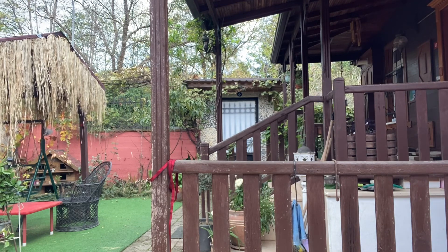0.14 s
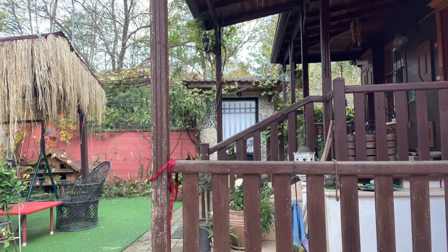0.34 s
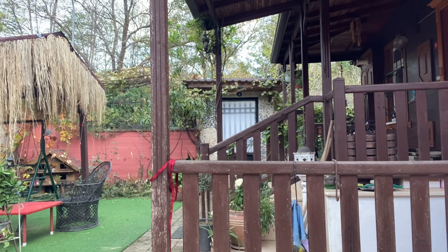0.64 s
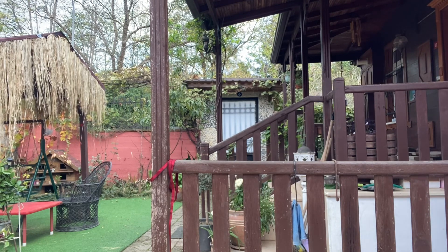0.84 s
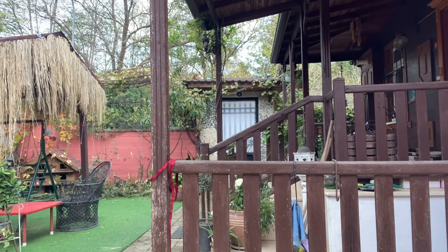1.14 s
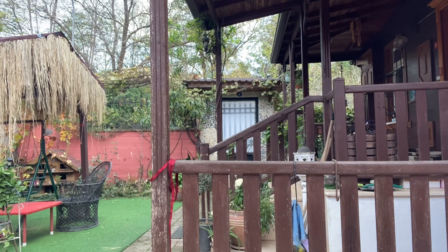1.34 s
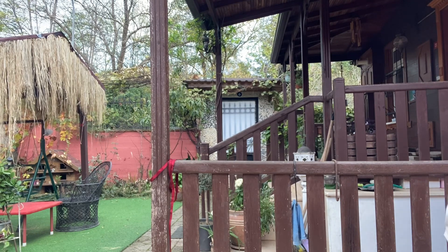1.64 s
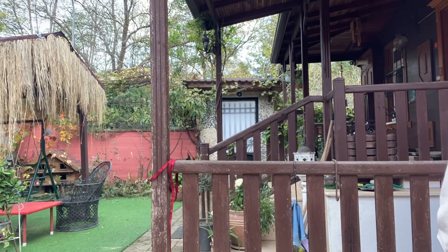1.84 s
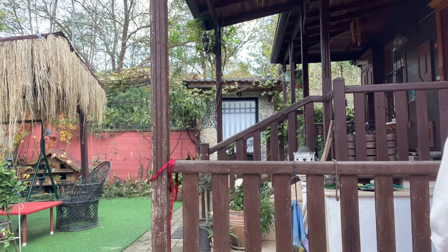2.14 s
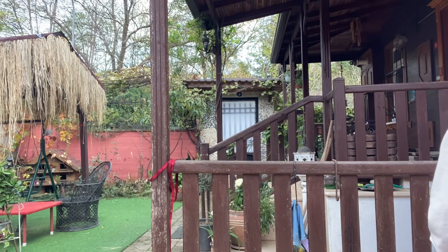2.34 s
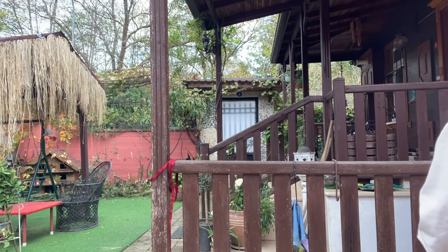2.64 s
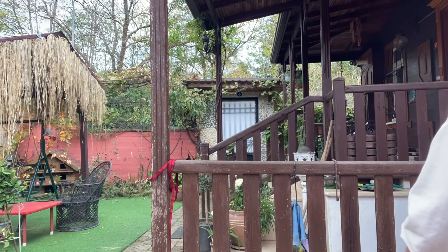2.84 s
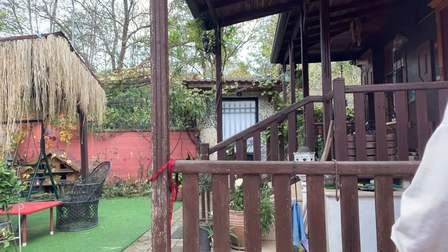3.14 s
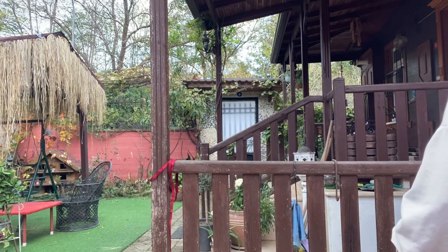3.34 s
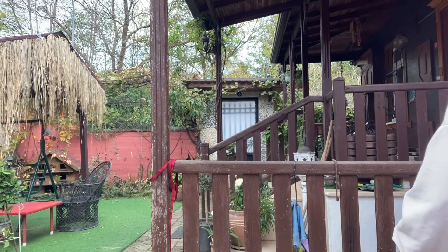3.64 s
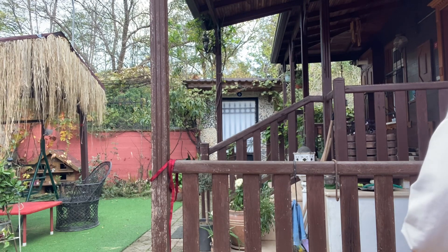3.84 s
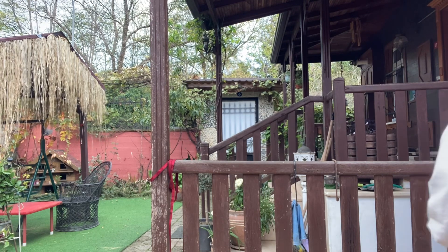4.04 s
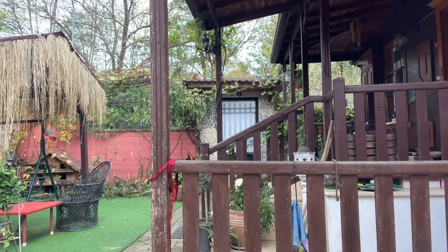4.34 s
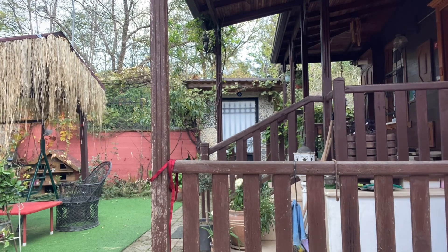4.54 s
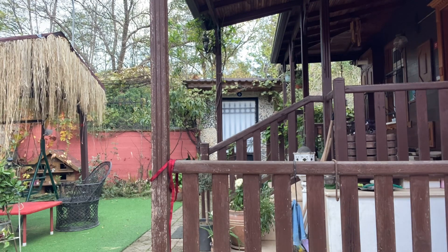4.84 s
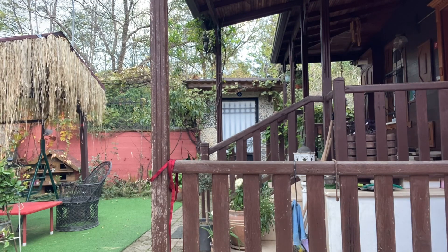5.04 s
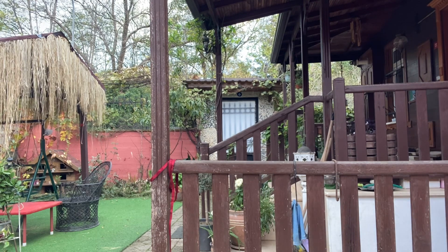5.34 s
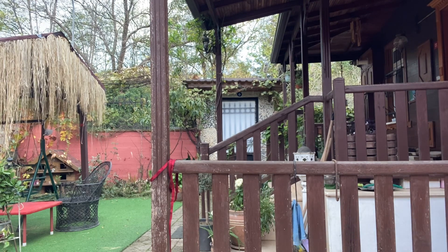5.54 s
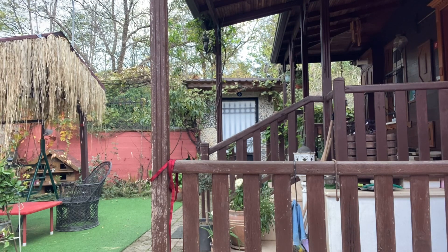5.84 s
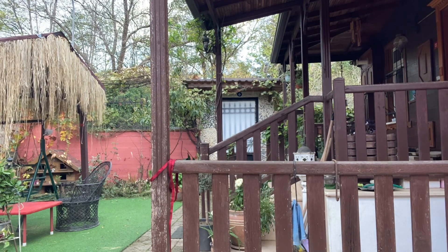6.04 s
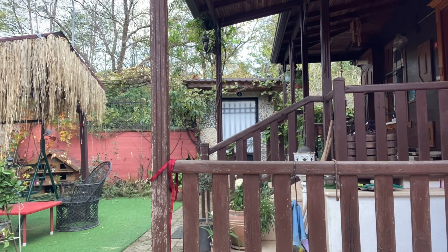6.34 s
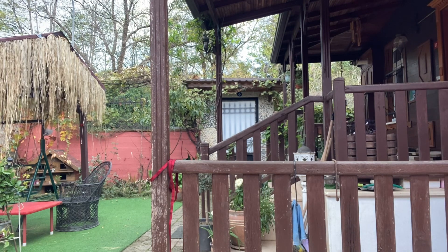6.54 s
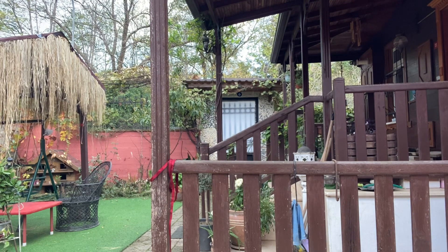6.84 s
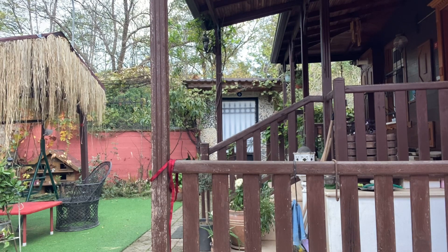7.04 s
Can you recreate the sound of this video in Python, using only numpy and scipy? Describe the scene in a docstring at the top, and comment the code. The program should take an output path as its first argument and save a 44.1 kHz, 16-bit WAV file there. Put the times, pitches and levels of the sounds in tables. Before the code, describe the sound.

A stiff broom sweeps a paved garden path in short, irregular strokes. The bristles hiss on stone, dry leaves scrape, twigs and grit tick, and the wooden head knocks now and then, hardest near the end. Distant traffic rumbles throughout: one engine slows away at the start, a faint motor hums midway, and another engine approaches at the close. The microphone sits on a porch nearby.

```python
"""Sweeping a garden path

A stiff broom sweeps dry leaves and grit over paving, out of sight of a phone on a porch. The bristles
hiss as they slip over the stone, the wooden head knocks and rings, and twigs and grit snap with a tick.
Traffic rumbles behind the wall: one engine slows away at the start, a far motor hums midway, and
another engine draws near at the end."""
import sys
import numpy as np
from scipy import signal
from scipy.fft import rfft, irfft, next_fast_len
from scipy.io import wavfile
from scipy.ndimage import uniform_filter1d, map_coordinates

SR = 44100
rng = np.random.default_rng(int(sys.argv[2]) if len(sys.argv) > 2 else 0)


def put_to_file(sound):
    """Save the sound as 16-bit audio at rate SR, in the file named by the first command-line argument."""
    columns = np.atleast_2d(sound).T  # one column per channel
    safe = np.clip(columns, -1, 1)
    whole_steps = np.round(safe * 32767)
    wavfile.write(sys.argv[1], SR, whole_steps.astype(np.int16))


N = 317455

TIME = np.arange(N) / SR
SHARED_ONLY = np.array([[1], [0]])  # puts a sound in the row that both microphones share


def amp(db):
    """Turn a level in decibels (dB) into a number to multiply by."""
    return 10 ** (np.asarray(db) / 20)


def along(points, hz):
    """Read between (frequency, value) points, giving each octave the same room."""
    freqs, values = np.transpose(points)
    return np.interp(np.log(hz + 1), np.log(freqs + 1), values)


def curves(rows):
    """Turn each table column after the time into one value per sample."""
    times, *columns = np.transpose(rows)
    return [np.interp(TIME, times, column) for column in columns]


def during(rows, fade_s):
    """1 while a table runs, fading in before it and out after it."""
    return np.clip(np.minimum(TIME - rows[0][0], rows[-1][0] - TIME) / fade_s + 1, 0, 1)


def wobble(rate):
    """A smooth curve through `rate` random values a second."""
    return map_coordinates(rng.standard_normal(int(N * rate / SR) + 4), [TIME * rate])


def filtered(x, response):
    """Multiply each frequency in x by response(frequency)."""
    size = next_fast_len(N + SR // 4)
    return irfft(rfft(x, size) * response(np.fft.rfftfreq(size, 1 / SR)), size)[..., :N]


def unit(x):
    """Scale x to an average strength (rms) of 1."""
    return x / np.sqrt(np.mean(x ** 2) + 1e-20)


def rush(spectrum, lo_hz, hi_hz, patchy_db, sizes=1):
    """Two noises with loud and soft patches, coloured by a spectrum, of strength 1 from lo to hi."""
    cells = signal.stft(sizes * rng.standard_normal((2, N)), nperseg=512)[2]
    patches = uniform_filter1d(rng.standard_normal(cells.shape[1:]), size=6, axis=0)
    patches = uniform_filter1d(patches, size=10, axis=1)
    pair = unit(signal.istft(cells * amp(patchy_db * unit(patches)), nperseg=512)[1][:, :N])
    colour = lambda hz: amp(along(spectrum, hz))
    band_power = np.mean(colour(np.linspace(lo_hz, hi_hz, 200)) ** 2) * (hi_hz - lo_hz) / (SR / 2)
    return filtered(pair, colour) / np.sqrt(band_power)


def tone(hz, multiple=1):
    """A pure tone of strength 1 on a multiple of a moving pitch."""
    return np.sqrt(2) * np.sin(multiple * 2 * np.pi * np.cumsum(hz) / SR + rng.uniform(0, 2 * np.pi))


def grains(size_db, clump_db):
    """Sizes of tiny slips, uneven and coming in clumps."""
    return amp(size_db * rng.standard_normal(N) + clump_db * (wobble(60) + wobble(250)))


def swell(times, levels_db, rise, fall):
    """Power of one movement: it rises to its first point and falls after its last (dB per second)."""
    edge_db = rise * np.minimum(TIME - times[0], 0) - fall * np.maximum(TIME - times[-1], 0)
    return 10 ** (np.maximum(np.interp(TIME, times, levels_db) + edge_db, -150) / 10)


def broom_pressure():
    """Strength of hiss, top treble and scrape: each stroke pushes, eases, lifts and trails off."""
    # broom strokes: (touch [s], push [s], lift [s], hiss at touch [dB], hiss at push [dB],
    # dragged leaves [dB over the hiss], top treble [dB over the hiss])
    strokes = [(-.05, -0.001, 0.4, -61, -59.5, -8, -2.5), (0.236, 0.313, 0.35, -65, -54.5, 0.5, -1.5),
               (0.61, 0.79, 1.04, -61.5, -53, -9, 2), (0.855, 0.945, 1.02, -55, -46, -9.5, -2),
               (1.307, 1.315, 1.35, -64, -59, -0.5, -6), (1.427, 1.44, 1.68, -57, -59.5, -17, 0),
               (1.58, 1.65, 1.73, -51, -50, -6, 0), (2.032, 2.046, 2.13, -63.5, -63.5, 1.5, -4),
               (2.13, 2.234, 2.37, -67, -58, -8, 1), (2.737, 2.737, 2.95, -61, -58, -2.5, 0.5),
               (2.86, 3, 3.04, -59, -51.5, -13, 0), (3.243, 3.273, 3.37, -75, -74, 4, -6),
               (3.404, 3.504, 3.65, -63.5, -56, -12, 1.5), (3.795, 3.857, 3.87, -65, -60.5, 0, -5),
               (4.236, 4.293, 4.4, -77, -72, 4.5, -7), (4.43, 4.452, 4.46, -72, -63, 3, -4),
               (4.474, 4.504, 4.53, -62, -59.5, 4, -5), (4.54, 4.556, 4.58, -65, -59, -1.5, -3),
               (4.816, 4.836, 5.3, -67, -71.5, -8, -4), (4.872, 4.94, 4.99, -57, -59, 1, 0),
               (5.065, 5.2, 5.23, -75, -56.5, -1.5, -4), (5.312, 5.39, 5.41, -77, -59, -17, 1.5),
               (5.401, 5.54, 5.75, -54.5, -46.5, -31, 0), (5.66, 5.68, 5.45, -52, -49.5, -18, -3),
               (5.77, 5.797, 5.82, -61, -59.5, -1, -2), (6.28, 6.45, 6.59, -63, -46, -11.5, 0.5),
               (6.573, 6.936, 7, -67, -69.5, 0.5, -3.5), (6.97, 7.097, 7.56, -70, -61, -2.5, -2)]
    # the broom shoves into a heap of leaves: (time [s], scrape level [dB], length [s])
    shoves = [(0.088, -60, 0.081), (0.603, -61, 0.025), (1.312, -67, 0.011), (1.43, -48, 0.0035),
              (2.038, -62, 0.065), (2.298, -58, 0.011), (2.728, -60, 0.026), (2.982, -56.5, 0.035),
              (3.548, -57.5, 0.037), (4.496, -59, 0.034), (4.874, -56, 0.02), (4.91, -56, 0.065),
              (5.663, -59, 0.024), (6.272, -49, 0.0045), (7.037, -63, 0.036)]
    ease_db, tail_db, tail_top_db = -8.5, -15.5, -5  # each stroke ends in a quieter, duller tail of hiss
    hiss, top = np.zeros(N), np.zeros(N)
    scrape = np.full(N, amp(-76.5) ** 2)  # a faint, steady background hiss under the strokes
    for touch, push, lift, touch_db, push_db, leaves_db, top_db in strokes:
        stroke = swell([touch, push, lift], [touch_db, push_db, push_db + ease_db], rise=1100, fall=379)
        tail = swell([lift], [push_db + tail_db], rise=1100, fall=69)
        hiss += stroke + tail
        top += amp(top_db) ** 2 * (stroke + amp(tail_top_db) ** 2 * tail)
        scrape += amp(leaves_db) ** 2 * (stroke + tail)
    for start, db, length in shoves:
        scrape += swell([start, start + length], [db, db], rise=808, fall=242)
    return np.sqrt([hiss, top, scrape])


def sweeping():
    """Many bristle tips slip over the stone; leaves and grit scrape along in front of them."""
    # the bristles' bright hiss: (frequency [Hz], relative level [dB])
    bristles = [(2500, -13.5), (4500, -6), (6500, -1.5), (8000, 0), (11000, -3), (13500, -2.5), (16000, -3)]
    # the leaves' lower scrape: (frequency [Hz], relative level [dB])
    leaves = [(600, -33), (1300, -8.5), (2200, -3), (3500, -1), (5500, -3.5), (8000, -12.5), (13000, -33)]
    hiss_gain, top_gain, scrape_gain = broom_pressure()
    hiss = rush(bristles, 5500, 16400, patchy_db=2, sizes=grains(size_db=1.5, clump_db=0.8))
    top = filtered(hiss, lambda hz: np.clip((hz - 9500) / 2500, 0, 1))
    scrape = rush(leaves, 2700, 5600, patchy_db=3, sizes=grains(size_db=4, clump_db=2))
    return hiss_gain * (hiss - top) + top_gain * top + scrape_gain * scrape


def traffic():
    """A far road: an uneven low rumble, the drone of engines and the smooth wash of tyres."""
    # how loud the road is: (time [s], rumble [dB], tyre wash [dB])
    levels = [(0, -35.5, -46.5), (.45, -39, -46.5), (.8, -44.5, -47), (1.14, -38.5, -48.5),
              (1.92, -43, -50), (2.61, -41, -53), (3.0, -39.5, -53), (4.1, -44.5, -54), (4.5, -39, -53.5),
              (5.3, -37.5, -53.5), (5.6, -39.5, -53), (6.06, -42, -52), (6.58, -38.5, -51),
              (6.95, -45.5, -47), (7.2, -48, -45.5)]
    # the colours of rumble, drone and tyre wash, each: (frequency [Hz], relative level [dB])
    rumble_colour = [(12, -52), (20, -48), (24, -27), (31, -12), (42, -3), (54, 0.5), (67, 1.5), (124, -17),
                     (156, -18.5), (200, -21), (260, -61), (440, -120)]
    drone_colour = [(70, -1.5), (110, 2), (160, -3), (250, -3), (400, -9), (600, -25), (1000, -61)]
    wash_colour = [(250, -9.5), (450, -1), (800, -1), (1200, -6), (2000, -10), (3000, -18), (5000, -24),
                   (8000, -36), (11000, -61), (14000, -68)]
    rumble_db, wash_db = curves(levels)
    rumble = amp(rumble_db + 0.74 * wobble(2.9)) * rush(rumble_colour, 43.4, 100, patchy_db=-0.5)
    drone = amp(wash_db + 1) * rush(drone_colour, 111, 486, patchy_db=1.5)
    wash = amp(wash_db) * rush(wash_colour, 420, 2460, patchy_db=1.9)
    return rumble + drone + wash


def leaving_engine():
    """An engine slows away: its exhaust note sinks and its noisy thrum dies down."""
    # the exhaust note, with a gap as the driver eases off:
    # (time [s], firing rate [Hz], level [dB], level an octave up [dB])
    exhaust = [(0, 89.15, -40.5, -56.5), (.35, 83.9, -41.5, -45.5), (.596, 74.4, -33.5, -53),
               (.75, 67.2, -29, -50), (.846, 61.1, -60, -48), (.926, 56.46, -37, -39),
               (.984, 57.23, -40, -49.5), (1.088, 55.14, -29.5, -50), (1.3, 54.5, -59, -72)]
    # the body of the engine's noise: (frequency [Hz], relative level [dB])
    thrum_colour = [(150, -33), (280, 4), (400, -10), (600, 6.5), (800, -10), (1200, -37)]
    hz, db, octave_db = curves(exhaust)
    firing = amp(db + 2.4 * wobble(12.2)) * tone(hz)
    octave = amp(octave_db + 3.45 * wobble(14.65)) * tone(hz + 0.79 * wobble(15), multiple=2)
    thrum = amp(-53 - 5.5 * TIME) * rush(thrum_colour, 250, 650, patchy_db=3)
    return during(exhaust, fade_s=0.18) * (firing + octave) * SHARED_ONLY + thrum


def head_knocks():
    """Each knock is a short rattle that sets the wooden head ringing, most strongly near one pitch."""
    # knocks: (time [s], level [dB], pitch struck hardest [Hz], spread around it [octaves],
    # rattle length [s], stretch of the ring time [factor])
    knocks = [(0.082, -40.5, 4600, 0.34, 0.064, 1.5), (0.988, -58, 1349, 1.2, 0.031, 1.1),
              (1.4222, -29.5, 1660, 0.055, 0.06, 2.5), (1.4238, -28, 755, 0.06, 0.045, 1.6),
              (1.4225, -34, 1180, .12, .04, 2.5), (1.43, -37.5, 343, 0.41, .04, .6),
              (1.426, -34, 2500, 0.48, 0.055, 1), (1.657, -37.5, 1480, 0.32, 0.096, 1.1),
              (2.037, -44.5, 1690, 0.52, 0.13, 1.1), (2.3, -39, 1670, 1.1, 0.054, .9),
              (2.731, -41, 1490, 1.5, 0.07, 1.1), (2.749, -42, 1530, 0.11, 0.063, 1.3),
              (2.773, -44.5, 1540, 0.13, 0.11, 1.3), (2.924, -40.5, 900, 0.3, 0.025, .6),
              (2.983, -36.5, 930, 0.37, 0.026, .7), (2.991, -34.5, 1600, 0.19, 0.043, .8),
              (3.307, -40.5, 960, 0.17, 0.038, 1.1), (3.576, -43.5, 1685, 0.42, 0.1, 1.1),
              (4.449, -52, 4200, .4, 0.027, .9), (4.496, -37, 2650, 0.3, .035, .6),
              (5.198, -31, 440, .35, .022, .8), (4.505, -43, 2485, 0.37, 0.039, .7),
              (4.556, -47.5, 4200, .5, 0.049, .8), (4.878, -43, 2400, 0.36, 0.066, .6),
              (4.928, -43, 2190, 0.5, 0.1, .6), (5.2, -35, 950, 0.27, .02, .7),
              (5.203, -41, 2420, 0.21, 0.041, .9), (5.421, -40, 2400, 0.087, 0.063, 1.1),
              (5.664, -41, 1670, 0.34, 0.11, 1.1), (6.2723, -21.5, 1110, 1.1, 0.033, .5),
              (6.2762, -18.5, 800, 0.88, 0.022, .7), (6.2794, -21.5, 500, 0.7, 0.022, .4),
              (6.287, -26.5, 2000, 0.71, 0.037, .5), (6.294, -26.5, 850, 0.31, 0.04, .6),
              (6.309, -31.5, 1199, 0.78, 0.12, .9), (6.657, -39, 1800, 0.99, 0.05, .9),
              (7.067, -35.5, 1490, 1.1, 0.086, .9)]
    # the head's own notes: (frequency [Hz], relative level [dB], time to fade 60 dB before stretch [s])
    head_notes = [(330, -7.5, 0.057), (448, -8, 0.047), (624, -22, 0.037), (766, -6, 0.035),
                  (822, -6, 0.03), (931, -2.5, 0.067), (1127, -6.5, 0.043), (1316, -14.5, .025),
                  (1540, -7, 0.022), (1660, -5.5, 0.03), (1790, -7, .02), (1875, -5, 0.025),
                  (2100, -7.5, 0.02), (2380, -9.5, 0.023), (2700, -21, .023), (2790, -16, 0.028),
                  (3100, -13, 0.013), (4800, 16, 0.0038)]
    out, t = np.zeros((2, N + SR)), np.arange(SR // 6) / SR
    hz, note_db, ring_s = np.transpose(head_notes)[:, :, None]
    for start, db, pitch_hz, spread, rattle_s, stretch in knocks:
        struck_db = -6 * (np.log2(hz / pitch_hz) / spread) ** 2 + rng.normal(0, 1.5, hz.shape)
        fades = amp(note_db + struck_db - 60 * t / (ring_s * stretch))
        ring = np.sum(fades * np.sin(2 * np.pi * hz * t), axis=0)
        burst = amp(-60 * (t / rattle_s) ** 2) * (1 - np.exp(-t / 0.000064))
        rattle = burst * rng.standard_normal((2, len(t)))
        rattle[:, 30] += 9  # the first blow is one clean push
        body = signal.fftconvolve(rattle, ring[None], axes=1)[:, :len(t)]
        body /= np.sqrt(np.mean(np.max(body ** 2, axis=1)))
        crack = signal.lfilter(*signal.butter(1, 5000, fs=SR), rattle)  # bare contact noise, dulled
        at = round(start * SR)
        out[:, at:at + len(t)] += amp(db) * body + amp(db - 22) * crack
    return signal.lfilter(*signal.butter(2, 260, "high", fs=SR), out[:, :N])  # a small head has no bass


def twig_snaps():
    """A twig or a bit of grit snaps in a few milliseconds and throws up a puff of debris."""
    # snaps: (time [s], level before filtering [dB], brightest frequency [Hz],
    # reach below and above it [factor], puff of debris [dB relative to the snap])
    snaps = [(.082, -33, 6100, 1.84, -11.5), (.611, -49, 9000, 1.5, -12), (1.317, -50, 8000, 1.5, -12),
             (1.4344, -30.5, 7900, 1.36, -12.5), (1.617, -42, 3800, 1.3, -20), (1.66, -30.5, 8000, 1.4, -8),
             (1.677, -37.5, 8000, 1.3, -19), (1.715, -44, 9000, 2, -21), (1.958, -52, 7000, 1.3, -22),
             (2.048, -41.5, 5500, 2, -15), (2.089, -39, 6500, 2.2, -30), (2.295, -33, 8960, 1.5, -11.5),
             (2.7325, -41, 5000, 1.4, -18), (2.879, -37, 8000, 1.4, -10), (2.974, -33, 12100, 1.5, -12),
             (2.989, -26.5, 5960, 1.37, -11.5), (3.087, -49, 11000, 1.9, -18), (3.268, -46, 7500, 1.1, -22),
             (3.5442, -29, 10000, 2, -22), (3.553, -38, 5460, 1.35, -24), (3.6475, -41, 10000, 1.7, -22),
             (3.811, -57, 8000, 1.49, -12), (4.473, -35, 6500, 2, -22), (4.5, -41, 4500, 1.5, -11),
             (4.537, -44, 10500, 1.5, -22), (4.994, -46, 7970, 1.3, -16), (5.665, -27, 8250, 1.36, -10.5),
             (5.7657, -41, 6000, 2.2, -22), (5.793, -45, 9000, 1.5, -12), (7.068, -47, 9000, 1.6, -12)]
    snap_s, puff_s = 0.0037, 0.083  # times to fade by 60 dB
    out, t = np.zeros((2, N + SR)), np.arange(SR // 8) / SR
    for start, db, hz, reach, puff_db in snaps:
        burst = (amp(-60 * t / snap_s) + amp(puff_db - 60 * t / puff_s)) * (1 - np.exp(-t / 0.00014))
        snap = burst * rng.choice([-1, 1], (2, len(t)))
        snap[0, 4] += 3.5  # the break itself is one clean push
        band = signal.butter(2, [hz / reach, min(hz * reach, .45 * SR)], "band", fs=SR)
        at = round(start * SR)
        out[:, at:at + len(t)] += amp(db) * signal.lfilter(*band, snap)
    return out[:, :N]


def motor_hum():
    """A far motor hums on one slightly wavering note."""
    # how loud the hum is: (time [s], level [dB])
    levels = [(3.4, -65.5), (4.25, -55.5), (5.13, -48), (5.55, -59), (5.97, -49.5), (6.1, -62.5)]
    db, = curves(levels)
    hum = amp(db + 3.5 * wobble(11)) * tone(hz=151.5 + 4 * wobble(10))
    return during(levels, fade_s=0.11) * hum * SHARED_ONLY


def coming_engine():
    """An engine draws near: a strong firing note, weaker unsteady overtones and a growing roar."""
    # the exhaust note: (time [s], firing rate [Hz], level [dB])
    exhaust = [(6.2, 49, -71), (6.338, 48.26, -36), (6.45, 49.73, -36.5), (6.54, 53.8, -35),
               (6.666, 53.7, -32.5), (6.772, 55.02, -24.5), (6.946, 54.85, -22.5), (7.199, 53.8, -29)]
    # the tones in that note: (multiple of the firing rate [factor], relative level [dB])
    overtones = [(1, -0.5), (2, -30), (3, -27.5), (4, -26.5), (5, -30), (7, -33), (8, -28.5)]
    # its rush through the air: (frequency [Hz], relative level [dB])
    roar_colour = [(400, -35), (650, -1.5), (900, 12), (1150, 4.5), (1700, -34.5)]
    hz, db = curves(exhaust)
    note = np.zeros(N)
    for multiple, tone_db in overtones:
        unsteady = multiple > 1
        gain = amp(db + tone_db + 4.5 * unsteady * wobble(14))
        note += gain * tone(hz + 0.703 * unsteady * wobble(16), multiple)
    closest_s, growth_db_per_s = exhaust[-1][0], 10.5
    roar_db = -46.5 + growth_db_per_s * (TIME - closest_s)
    roar = amp(roar_db) * rush(roar_colour, 500, 1400, patchy_db=2.5)
    return during(exhaust, fade_s=0.05) * note * SHARED_ONLY + roar


def yard_echo(x):
    """The porch and walls throw the sound back; each frequency dies away at its own speed."""
    # how long the echo lasts: (frequency [Hz], time to fade 60 dB [s])
    fade_times = [(300, 0.59), (1500, 0.4), (5000, 0.1), (12000, 0.13)]
    hz, t, cells = signal.stft(rng.standard_normal((2, SR // 2)), SR, nperseg=256)
    tail = signal.istft(cells * amp(-60 * t / along(fade_times, hz)[:, None]), SR, nperseg=256)[1]
    delayed = np.pad(x, ((0, 0), (600, 0)))
    return signal.fftconvolve(delayed, tail / np.linalg.norm(tail[0]), axes=1)[:, :N]


def scene():
    """All the sounds in two rows: what both microphones share, and what sets left apart from right."""
    hits = head_knocks() + twig_snaps()
    broom = sweeping()
    echo = yard_echo(amp(-12.5) * hits + amp(-14) * broom)
    return broom + hits + echo + traffic() + leaving_engine() + motor_hum() + coming_engine()


def record(dry):
    """The phone's two microphones hear the bass in step and the treble out of step."""
    # how alike left and right are: (frequency [Hz], likeness [0 to 1])
    likeness = [(60, 1), (170, 0.67), (400, 0.56), (600, 0.3), (1100, 0.31), (2300, 0.22), (4500, 0.047),
                (5700, 0.48), (6600, 0.1), (7600, 1), (16000, 1)]
    # how far the wave at the right microphone runs ahead: (frequency [Hz], lead [radians])
    right_lead = [(150, 0), (430, 1.12), (950, 3), (2000, 3.5), (2600, -0.35), (5200, -3), (15700, -16)]
    # how much louder the left microphone is: (frequency [Hz], level [dB])
    left_louder = [(60, 1.5), (110, -2), (200, -0.5), (380, -1.5), (700, -1), (1290, -0.5), (2380, 0.5),
                   (4400, -0.5), (8120, -0.5), (15000, 0.5)]
    bass_cut_hz, top_hz = 42, 15740
    lead_hz, lead = np.transpose(right_lead)
    sides = np.array([[1], [-1]])  # left, right

    def blend(hz):
        """Weights of the two rows: the more alike the sides, the more of the shared one."""
        angle = np.arccos(np.clip(along(likeness, hz), 0, 1)) / 2
        return np.array([np.cos(angle), np.sin(angle)])

    def microphones(hz):
        """Each side has its own level and timing; both lose the deepest bass and highest treble."""
        balance = amp(along(left_louder, hz) * sides / 2)
        timing = np.exp(-.5j * np.interp(hz, lead_hz, lead) * sides)
        ratio = 1j * hz / bass_cut_hz
        bass_cut = ratio ** 2 / (1 + 1.3 * ratio + ratio ** 2)
        return balance * timing * bass_cut * (hz < top_hz)

    shared, apart = filtered(dry, blend)
    return filtered(shared + sides * apart, microphones)


dry = scene()
out = record(dry)
put_to_file(out)
```